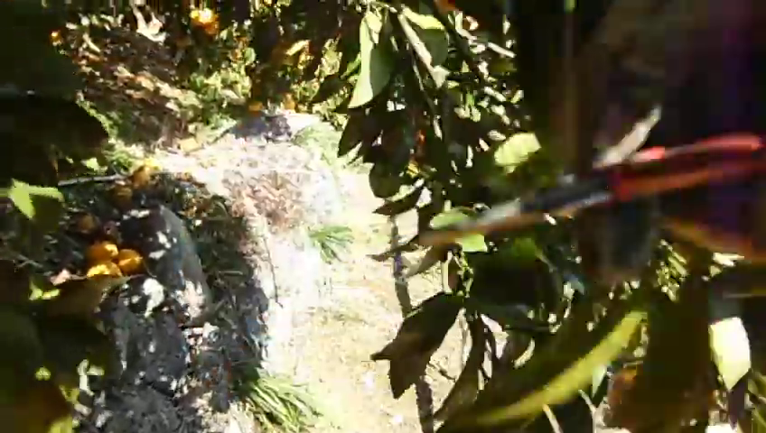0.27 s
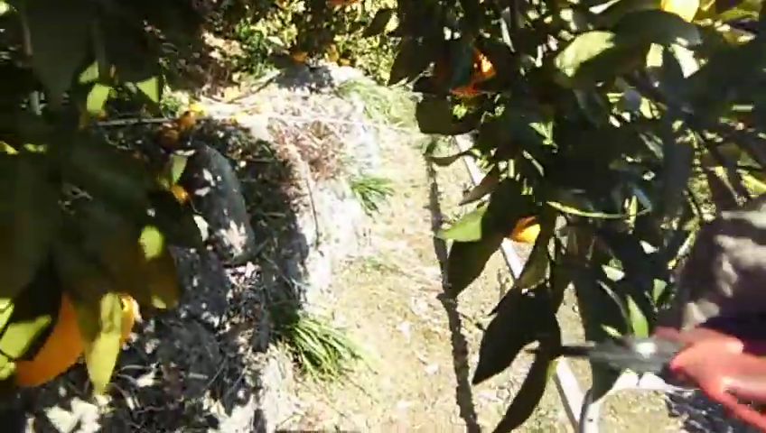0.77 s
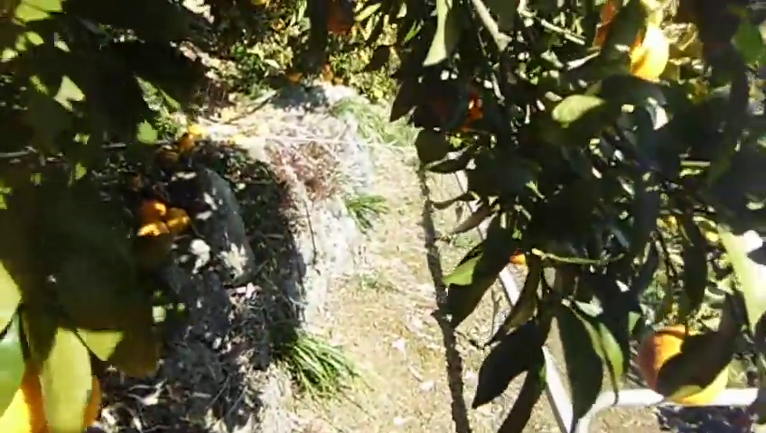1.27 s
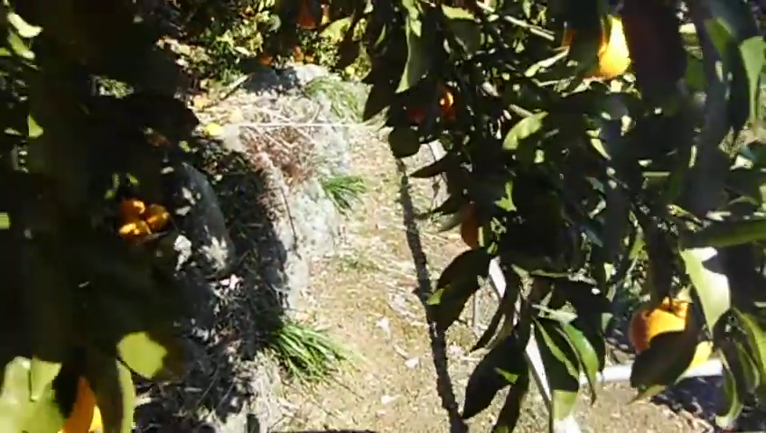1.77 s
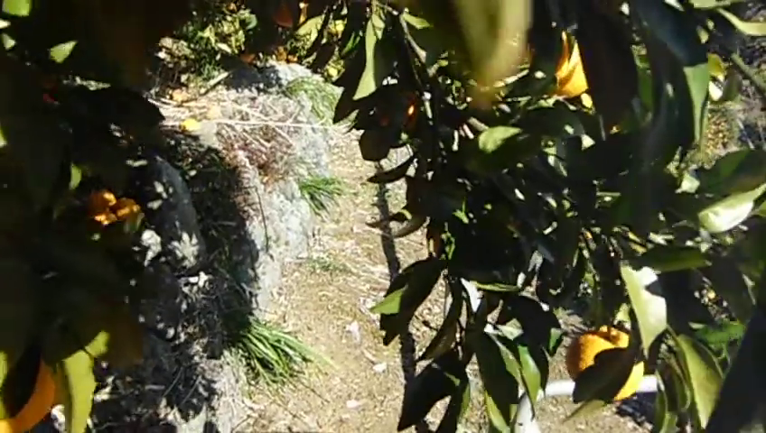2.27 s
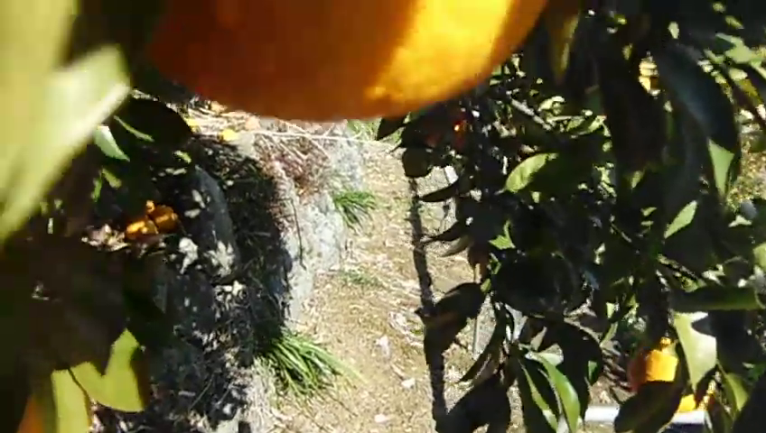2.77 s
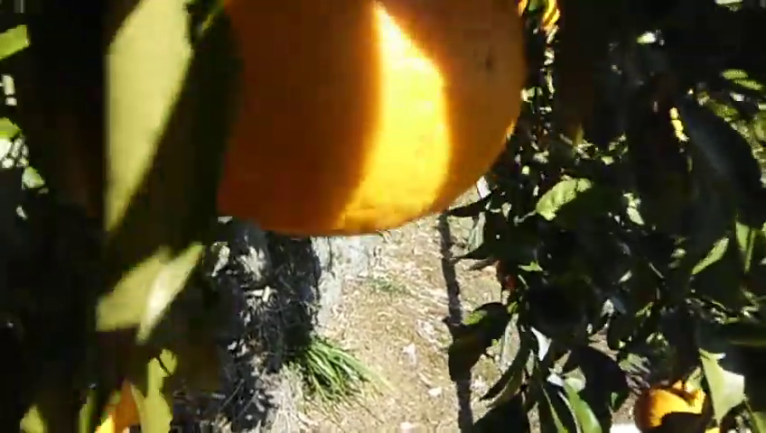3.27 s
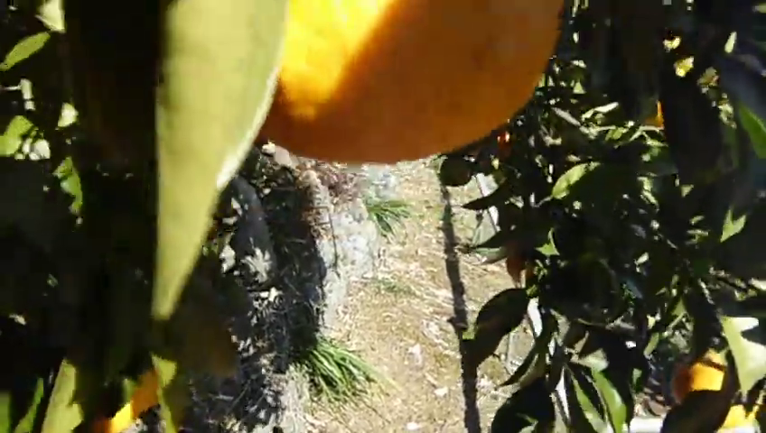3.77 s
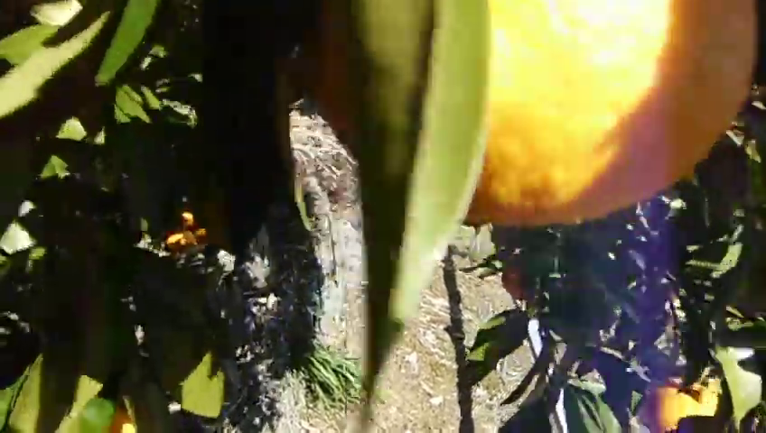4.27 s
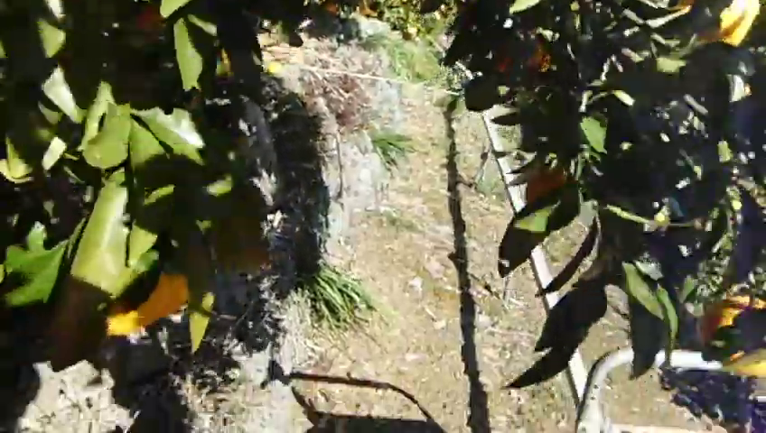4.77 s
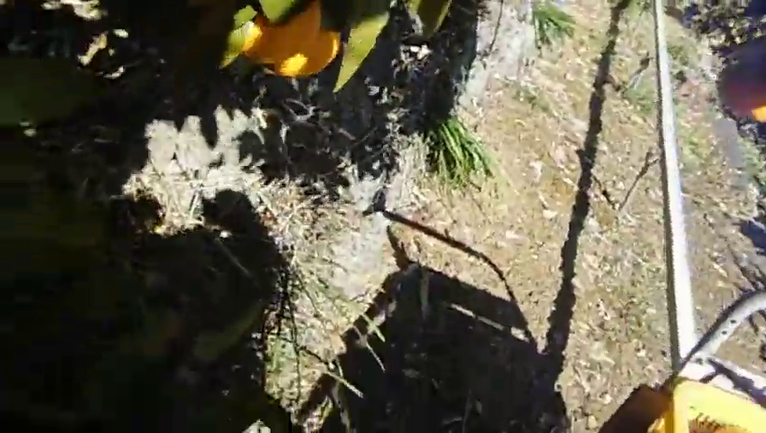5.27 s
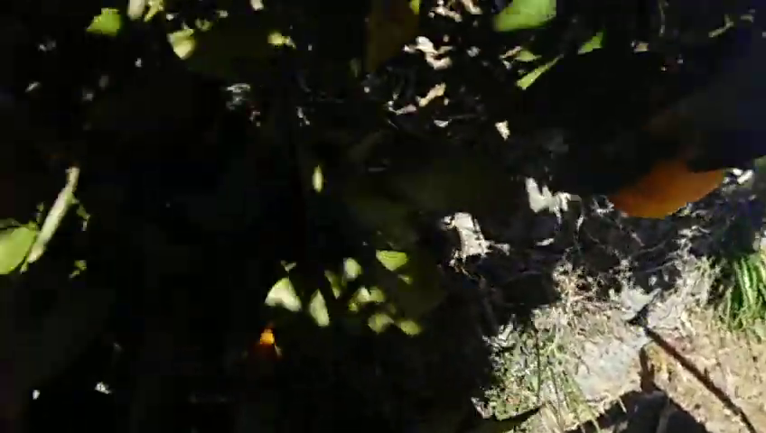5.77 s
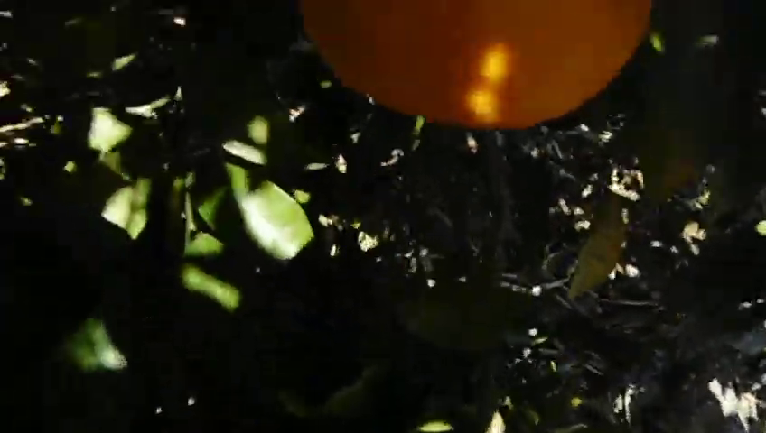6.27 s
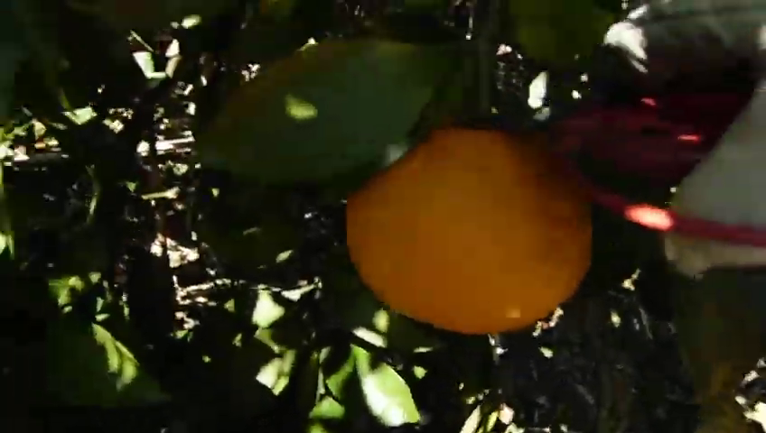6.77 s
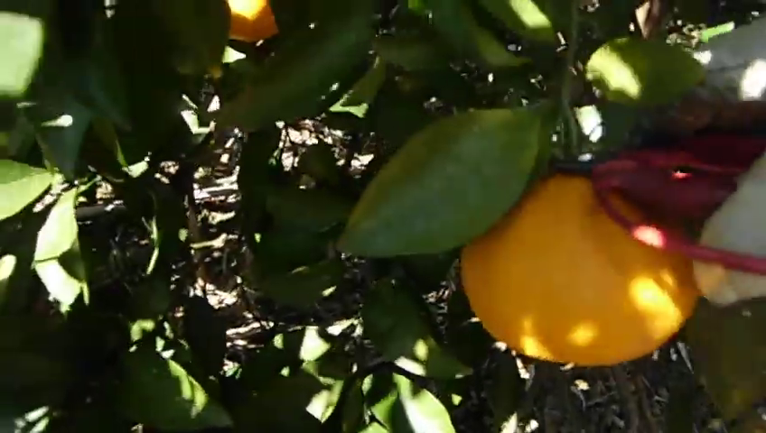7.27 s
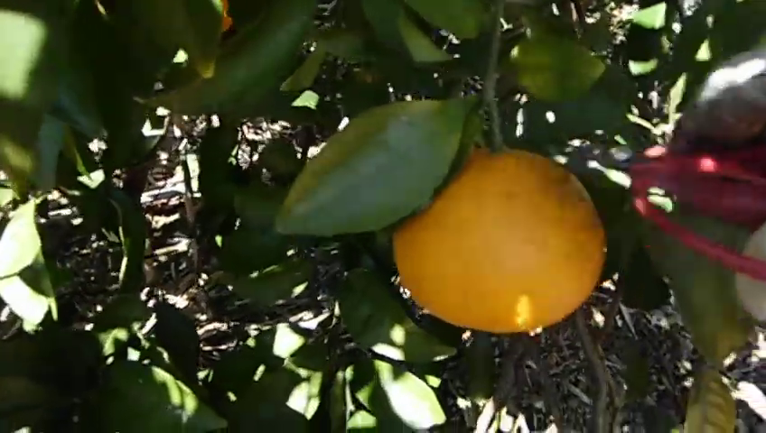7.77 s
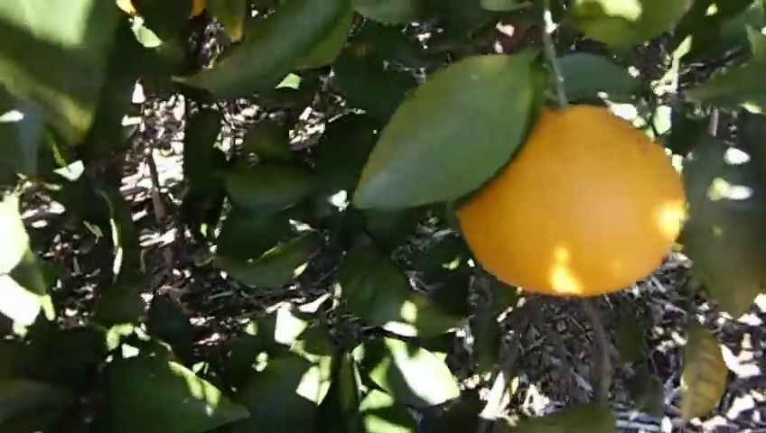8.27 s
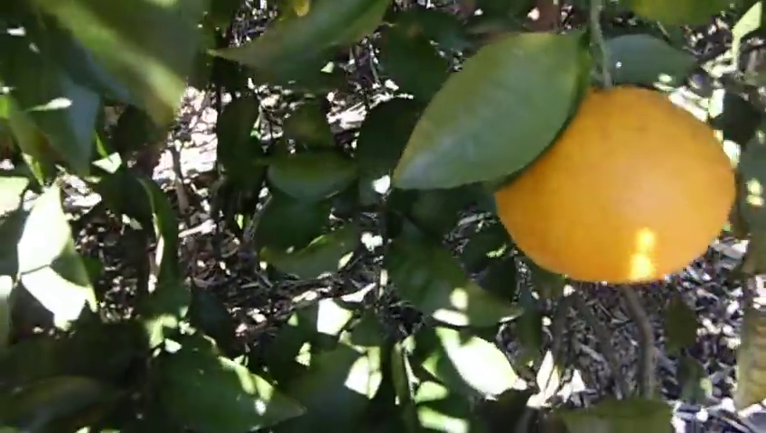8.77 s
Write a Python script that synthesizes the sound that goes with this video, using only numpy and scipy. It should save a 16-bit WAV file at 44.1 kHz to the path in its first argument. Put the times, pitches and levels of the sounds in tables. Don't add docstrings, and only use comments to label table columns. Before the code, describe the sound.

A close, dry take among fruit trees: a sharp metallic snip, leaf crackle and tiny squeaks, then several seconds of light rustling and pricking leaves. A second snip follows, with bigger leaf snaps, bumps on the camera body, a spring squeak and one hard steel click. Afterwards only sparse twig taps, leaf flicks, faint squeaks and quiet preamp hiss remain.

```python
import sys
import numpy as np
from scipy import signal
from scipy.fft import rfft, irfft
from scipy.io import wavfile
from scipy.ndimage import uniform_filter1d

SR = 44100
rng = np.random.default_rng(int(sys.argv[2]) if len(sys.argv) > 2 else 0)


def log_audio(samples):
    frames = np.atleast_2d(samples).T
    limited = np.clip(frames, -1, 1)
    pcm = np.round(limited * 32767).astype(np.int16)
    wavfile.write(sys.argv[1], SR, pcm)


def amplitude_ratio(level_db):
    exponent = np.asarray(level_db, float) / 20
    return 10 ** exponent


N = 397782


def evened(x):
    return x / np.sqrt(np.mean(x ** 2) + 1e-20)


def peaked(x):
    return x / abs(x).max()


def add(mix, s, sound):
    part = mix[round(s * SR):][:len(sound)]
    part += sound[:len(part)]


def coloured(x, points):
    f, db = np.transpose(points)
    hz = np.fft.rfftfreq(len(x), 1 / SR)
    curve_db = np.interp(np.log(hz + 1), np.log(f + 1), db)
    return evened(irfft(rfft(x) * amplitude_ratio(curve_db), len(x)))


def ring(x, modes):
    out = np.zeros(len(x))
    for hz, width, db in modes:
        pole = np.exp((2j * np.pi * min(hz, .45 * SR) - np.pi * width) / SR)
        out += amplitude_ratio(db) * 2 * signal.lfilter([1 - abs(pole)], [1, -pole], x).real
    return out


def swells(rows, rest_db):
    t = np.arange(N) / SR
    power = amplitude_ratio(rest_db) ** 2
    for s, db, rise, fall in rows:
        steps = np.maximum((s - t) / rise, (t - s) / fall)
        power = power + amplitude_ratio(db - 10 * steps) ** 2
    return 10 * np.log10(power)


# (frequency [Hz], level [dB per Hz])
HISS_COLOUR = [(4.7, -24), (8.0, -6), (18, -16.5), (33, -18), (62, -20), (113, -26.5), (151, -29),
               (419, -33), (508, -40.5), (699, -44), (1660, -55.5), (9900, -53), (16500, -68.5)]


def preamp_hiss():
    return amplitude_ratio(-61.5) * coloured(rng.standard_normal(N), HISS_COLOUR)


def slips(per_s, spread_db, length):
    out, t = np.zeros(N), np.arange(400)
    size_db = spread_db * np.minimum(rng.exponential(1, N), 3.5)
    size = amplitude_ratio(size_db) * (rng.random(N) < per_s / SR)
    kind = rng.integers(0, 12, N)
    for k, hz in enumerate(np.geomspace(2200, 11000, 12)):
        puff = rng.standard_normal(400) * np.exp(-t / length)
        puff = 0.14 * evened(puff) + evened(ring(puff, [(hz, 0.75 * hz, 0)]))
        out += signal.oaconvolve(size * (kind == k), puff)[:N]
    return evened(out)


def patchy(x, depth_db):
    z = signal.stft(x, nperseg=256)[2]
    field = uniform_filter1d(rng.standard_normal(z.shape), 12, axis=0)
    field = evened(uniform_filter1d(field, 16, axis=1))
    return evened(signal.istft(z * amplitude_ratio(depth_db * field), nperseg=256)[1][:N])


def clumps():
    return evened(uniform_filter1d(uniform_filter1d(rng.standard_normal(N), 500), 300))


# (frequency [Hz], level [dB per Hz])
CRACKLE_COLOUR = [(710, -30), (1200, -24.5), (2220, -6), (2530, -8), (2980, -5.5), (9430, -1), (13000, -9),
                  (15300, -15), (16000, -33.5), (16500, -41)]
# (frequency [Hz], level [dB per Hz])
RUB_COLOUR = [(150, -15), (300, -0.5), (600, -2.5), (1200, -6), (2200, -15), (4000, -17), (8000, -30)]
# (time of most motion [s], rustle level [dB], rub level [dB], 10 dB swell [s], 10 dB settle [s])
MOVES = [(.12, -48.5, -61, .12, .15), (.35, -52.5, -58.5, .12, .27), (.92, -62, -68.5, .1, .4),
         (1.38, -61.5, -70, .4, .3), (1.61, -59, -67.5, .2, .25), (2.0, -65.5, -74, .2, .2),
         (2.64, -67, -69, .3, .2), (2.9, -64, -70, .15, .15), (3.02, -58, -69, .06, .05),
         (3.2, -66, -67, .2, .3), (1.07, -61, -72, .04, .06), (3.56, -57.5, -69.5, .15, .07),
         (4.12, -59.5, -72.5, .25, .2), (4.47, -55, -63, .1, .4), (4.72, -51.5, -58, .1, .2),
         (5.5, -65, -68.5, .5, .4), (5.78, -60, -64.5, .15, .3), (5.98, -54, -67, .15, .17),
         (6.3, -62, -71.5, .3, .4), (6.57, -62, -73, .3, .6), (7.02, -61.5, -69, .15, .13),
         (7.48, -66.5, -76, .12, .2), (7.85, -68.5, -74, .2, .3), (8.17, -64, -71, .15, .25),
         (8.4, -61.5, -75, .15, .1), (8.74, -63.5, -70.5, .25, .15), (8.97, -60, -75, .12, .3)]
# (time [s], crackle level [dB])
SHAKES = [
    [(.034, -38), (.05, -47), (.085, -49.5), (.11, -51), (.2, -55), (.3, -62)],
    [(4.366, -37), (4.392, -36.5), (4.415, -43.5), (4.435, -40), (4.46, -51.5), (4.6, -66)],
]


def foliage():
    slower = 1.4
    rustle_rows = [(s, db, rise, fall) for s, db, _, rise, fall in MOVES]
    rub_rows = [(s, db, rise * slower, fall * slower) for s, _, db, rise, fall in MOVES]
    rustle_db, rub_db = swells(rustle_rows, -75), swells(rub_rows, -80)

    noise, clump = rng.standard_normal(N), clumps()
    drive = patchy(noise + 0.53 * slips(800, 4.0, 30.), 1.6) * amplitude_ratio(1.6 * clump)
    rustle = coloured(drive, CRACKLE_COLOUR) * amplitude_ratio(rustle_db)
    rub = coloured(noise + .7 * drive, RUB_COLOUR) * amplitude_ratio(rub_db)

    t = np.arange(N) / SR
    shake = sum(amplitude_ratio(np.interp(t, *np.transpose(rows), -120, -120)) for rows in SHAKES)
    crackle = (.7 * noise + slips(1200, 4.3, 45.)) * amplitude_ratio(2.5 * clump)
    shaken = coloured(crackle, CRACKLE_COLOUR) * shake * amplitude_ratio(-2.5)
    return rustle + rub + shaken


def let_go(rows, t60, share, wide):
    out, t = np.zeros(N), np.arange(2400) / SR
    band = signal.butter(3, (1700, 11900), "bandpass", fs=SR)
    for s, db, hz, knock_db in rows:
        noise, lumps = rng.standard_normal((2, 2400))
        burst = noise * np.exp(1.5 * uniform_filter1d(lumps, 12)) * amplitude_ratio(-60 * t / t60)
        burst *= np.minimum(t / .0005, 1)
        dry_edge = peaked(signal.lfilter(*band, burst))
        ringing = peaked(ring(burst, [(hz, wide * hz, 0)]))
        edge = peaked((1 - share) * dry_edge + share * ringing)
        knock = peaked(ring(burst, [(150, 360, -5.5), (327, 670, 0), (1040, 310, -7.5)]))
        add(out, s - .0005, amplitude_ratio(db) * (edge + amplitude_ratio(knock_db + 8.5) * knock))
    return out


# (time [s], peak level [dB], ring [Hz])
PRICKS = [(.254, -39, 3400), (.567, -44, 7200), (.633, -45, 4800), (.964, -45, 5900), (1.057, -43, 3800),
          (1.169, -47, 8800), (1.186, -47, 10000), (1.537, -45, 4700), (1.77, -47, 7800), (1.78, -48, 2400),
          (1.87, -52, 2900), (2.053, -51, 9000), (2.073, -46, 3000), (2.12, -51, 2100), (2.136, -54, 7200),
          (2.218, -51, 2100), (2.372, -52, 3800), (2.463, -52, 3800), (2.593, -49, 3600),
          (2.801, -50, 5000), (2.966, -47, 11400), (3.123, -43, 4300), (3.143, -48, 2600),
          (3.179, -45, 2600), (3.238, -51, 10900), (3.402, -49, 7800), (3.546, -43, 5200),
          (3.601, -49, 2100), (3.619, -46, 1900), (4.016, -48, 8470), (4.039, -48, 4000),
          (4.155, -47, 6500), (4.2176, -43, 7170), (4.309, -46, 8000), (4.322, -46, 7500),
          (4.7615, -41, 2900), (4.836, -45, 2100), (5.464, -50, 6000), (5.681, -48, 9500),
          (5.74, -46, 2200), (5.966, -44, 3000), (6.09, -43, 9100), (6.348, -48, 9800), (6.399, -47, 10000),
          (6.464, -44, 6900), (6.751, -43, 4300), (7.19, -49, 3800), (7.441, -47, 3350),
          (7.5024, -49, 5650), (7.7059, -48, 3910), (7.839, -48, 3500), (8.066, -47, 4500),
          (8.138, -46, 4500), (8.2068, -46, 4000), (8.249, -49, 1800), (8.454, -48, 2800),
          (8.683, -45, 6500), (8.6992, -45, 3430), (8.8069, -50, 7640), (8.897, -49, 10000)]


def pricks():
    return let_go([(*row, -19) for row in PRICKS], t60=.009, share=.55, wide=.4)


# (time [s], peak level [dB], ring [Hz])
FLICKS = [(2.6762, -42, 8200), (2.9522, -43, 10700), (3.4086, -37, 8800), (3.4264, -45.5, 8760),
          (4.1246, -41, 9200), (4.236, -44.5, 7800), (4.2574, -42, 7050), (4.2966, -43, 7890),
          (4.408, -28, 9930), (5.551, -32, 8300), (5.8321, -43, 8530), (6.2526, -44, 8810),
          (7.5772, -43, 7950), (7.642, -43.5, 8010), (7.7935, -40.5, 9270), (7.956, -39, 6460)]


def flicks():
    return let_go([(*row, -30) for row in FLICKS], t60=.014, share=.82, wide=.3)


# (time [s], peak level [dB], ring [Hz], knock level [dB])
TWIGS = [(.2352, -35, 4050, -31), (.2913, -32, 3930, -24), (.3632, -38, 2160, -16), (.393, -42, 2200, -2.5),
         (2.703, -42, 2560, -31), (3.228, -49, 2570, -14), (3.464, -52.5, 1590, -2.5),
         (3.5874, -39.5, 4470, -21), (4.6697, -36, 1490, -8), (4.7135, -36, 3060, -4),
         (4.754, -41, 3040, -31), (4.768, -46, 1950, -26), (4.8575, -30.5, 3020, -17),
         (5.4287, -35, 3000, -50), (5.5189, -41.5, 3000, -26), (6.0464, -33, 2400, -18),
         (6.0788, -44, 4410, -16), (6.3869, -45, 3300, -12), (6.7754, -46.5, 3110, -17),
         (6.9253, -38.5, 3200, -5), (7.0616, -51, 3070, -18), (7.237, -49, 4840, -18),
         (7.2592, -48, 2930, -12), (6.742, -53, 2400, -6), (8.0713, -42, 4690, -31),
         (8.5071, -46, 3000, -11), (8.9417, -22.5, 4300, -36)]


def twigs():
    return let_go(TWIGS, t60=.018, share=.8, wide=.3)


# (time [s], peak level [dB], knock level [dB])
SNAPS = [(.0937, -27.5, -31), (.0997, -29, -23), (.104, -30, -33), (.4316, -37, -36), (.451, -40, -25),
         (.974, -43, -24), (1.381, -36, -24), (1.3947, -32.5, -26), (1.9325, -39, -26), (1.954, -39, -18.5),
         (1.969, -34, -24), (3.1103, -39, -13), (3.5216, -42, -17), (3.6088, -39, -22),
         (3.6541, -45.5, -18), (4.372, -29, -18), (4.4134, -30, -21), (4.4288, -24, -20), (4.784, -35, -20),
         (5.977, -41, -19), (6.9458, -38.5, -8), (7.4545, -37, -28), (7.5242, -43.5, -19),
         (7.86, -36.5, -30), (7.9964, -38.5, -21), (8.3866, -29.5, -19), (8.8714, -37.5, -24),
         (8.9412, -30, -40), (8.9795, -37, -34), (9.0032, -38, -38), (.139, -39, -28)]


def snaps():
    rows = [(s, db, 6500, knock_db) for s, db, knock_db in SNAPS]
    return let_go(rows, t60=.013, share=.15, wide=.3)


# (time [s], peak level [dB], ring [Hz], knock below 1.5 kHz [dB])
DRAGS = [(.3372, -33.5, 7760, -13.5), (.9341, -34, 5100, -20), (1.043, -43, 3280, -21),
         (1.5635, -25, 5950, -22), (3.0975, -34, 7670, -17), (4.3792, -23, 3400, -20),
         (4.3889, -27, 4940, -17), (4.638, -25, 2700, -12), (4.6457, -23.5, 2940, -36),
         (4.6753, -34.5, 2570, -27), (4.6897, -28.5, 7210, -14), (6.007, -37, 4520, -14),
         (6.2684, -39, 7000, -23), (7.8327, -45, 4180, -20), (8.118, -36.5, 4570, -27),
         (8.1545, -42, 7500, -25), (8.6319, -35, 5360, -28), (8.6765, -41, 3300, -23),
         (8.941, -25, 9800, -45), (9.009, -41, 9500, -35), (1.943, -44, 6000, -22), (1.996, -45, 7000, -25),
         (1.718, -46, 4500, -25), (3.152, -48, 2300, -22), (8.147, -42, 3700, -14), (6.3, -42, 8500, -30),
         (5.79, -45, 3000, -20), (1.572, -33, 8000, -28), (8.952, -38, 4250, -35), (5.587, -49, 4500, -30)]


def drags():
    return let_go(DRAGS, t60=.038, share=.3, wide=.25)


# (time [s], thump level [dB], 10 dB swell [s], 10 dB settle [s])
THUMPS = [
    (.335, -50, .004, .16),
    (4.683, -43.5, .004, .1),
    (4.79, -47, .08, .025),
    (6.748, -55, .021, .023),
    (6.935, -45, .006, .015),
    (7.06, -60, .1, .02),
]
# (frequency [Hz], level [dB per Hz])
THUMP_COLOUR = [(15, -13.5), (35, -2), (70, -0.5), (140, -7.5), (300, -21.5), (600, -35)]
# (time [s], level [dB], body swing [Hz])
KNOCKS = [(0.0268, -24, 320), (.027, -33, 110), (4.354, -25, 350), (4.354, -34, 60), (3.098, -46, 600),
          (8.387, -44, 500), (4.722, -35, 45), (.3365, -32, 112), (.337, -38, 330), (.934, -42, 298),
          (4.636, -37, 196), (4.676, -29, 800), (4.689, -27, 60), (4.713, -44, 300), (6.9255, -35.5, 166),
          (6.946, -41, 266), (.372, -42, 90), (.397, -40, 60), (.438, -45, 70), (.458, -45, 50),
          (4.757, -41, 70), (4.784, -41, 80), (4.796, -42, 45), (1.563, -39, 450)]


def hand():
    out = coloured(rng.standard_normal(N), THUMP_COLOUR) * amplitude_ratio(swells(THUMPS, -120))
    t = np.arange(2000) / SR
    for s, db, hz in KNOCKS:
        onset = np.minimum(t / (.0002 + .1 / hz), 1)
        swing = np.cos(2 * np.pi * hz * t * (1 - 7.0 * t))
        add(out, s, amplitude_ratio(db) * onset * swing * np.exp(-(60 + 0.91 * hz) * t))
    return out


def whistle():
    s, length_s, db, mode = .187, .013, -51, [(12800, 1500, 0)]
    t, out = np.arange(1200) / SR, np.zeros(N)
    scrape = evened(ring(ring(rng.standard_normal(1200), mode), mode))
    add(out, s, amplitude_ratio(db) * scrape * np.minimum(t / .001, 1) * np.exp(-(t / length_s) ** 2))
    return out


# (time [s], length [s], level [dB], low mode relative level [dB], pitch drop [share])
SQUEAKS = [(.158, .021, -57, -16, .2), (.185, .022, -46.5, -20, .15), (.21, .024, -53, -20, .16),
           (4.646, .018, -42, -24, -.017), (4.718, .015, -48, -26, -.031), (5.034, .03, -45, -20, -.014),
           (6.455, .05, -77, 8, .038), (6.495, .055, -71, 10.5, .023), (7.064, .052, -58, -6, -.02),
           (7.084, .02, -52, -18, -.034), (7.099, .018, -52, -18, -.0094), (7.116, .022, -42, -11, -.0026),
           (7.256, .014, -69, 3, -.022), (8.8805, .011, -50, -13, -.015)]
# (frequency [Hz], level [dB])
COIL = [(2930, -0.5), (3300, -9), (3480, -12.5), (4600, -11)]


def spring():
    out, t = np.zeros(N), np.arange(2600) / SR

    def swell(late, length):
        return np.sin(np.pi * np.clip((t - late) / length, 0, 1)) ** 1.2

    for s, length, db, low_db, sink in SQUEAKS:
        noise = rng.standard_normal((6, 2600))
        wobble = uniform_filter1d(noise, 150, axis=1) * np.sqrt(150)
        upper_db = -3 + 40 * sink
        modes = [(hz, mode_db + upper_db * (k > 0), 0) for k, (hz, mode_db) in enumerate(COIL)]
        modes.append((1150, low_db, 0.28 * length))
        squeak = 0.6 * 0.43 * evened(ring(noise[5], [(2700, 1600, 0)])) * swell(0, length)
        for (hz, mode_db, late), w in zip(modes, wobble):
            turns = hz * (1 - sink) * np.cumsum(1 + .018 * w[::-1] - 0.3 * t) / SR
            squeak += amplitude_ratio(mode_db + 3.6 * w) * swell(late, length) * np.sin(2 * np.pi * turns)
        add(out, s, amplitude_ratio(db) * squeak)
    return out


def crack(length):
    t = np.arange(1200) / SR
    return rng.standard_normal(1200) * np.sqrt(t / length) * np.exp(-t / length)


# (time [s], level [dB], modes (frequency [Hz], width [Hz], level [dB]), burst [s])
LATCH = [
    (5.0651, -10.5, [(8000, 1000, -5), (9600, 1200, -6), (11200, 2100, -5), (4650, 900, -8), (6000, 1200, -10)], 0.00028),
    (5.0655, -28, [(2000, 500, -3), (2450, 600, -1), (3400, 800, -2)], 0.0011),
]


def latch():
    out = np.zeros(N)
    for s, db, modes, length in LATCH:
        add(out, s - .0002, amplitude_ratio(db) * peaked(ring(ring(crack(length), modes), modes)))
    return signal.lfilter(*signal.butter(1, 1200, "highpass", fs=SR), out)


# (time [s], level [dB], handle share [0-1], burst [s], leading blade mode [Hz])
CRACKS = [(.0241, -14, .3, .0006, 8000), (.0257, -5, .4, .0004, 10300), (.027, -1, 0, .0006, 11300),
          (.0281, -4, .5, .0005, 9550), (.0292, -9, .3, .0006, 9550), (.0306, -20, .5, .002, 9500),
          (4.3483, -28, .2, .0005, 9000), (4.3517, -10, .1, .0004, 9050), (4.3532, -6, .08, .0004, 7200),
          (4.3538, -4, 0, .0004, 9050), (4.3549, -3, .1, .0004, 11000), (4.3555, -10, .85, .0007, 10200),
          (4.3568, -16, .1, .0005, 8500), (4.3582, -19, .2, .0012, 9500), (4.363, -25.5, .1, .0033, 8500)]
# (frequency [Hz], width [Hz], level [dB])
BLADES = [(5600, 750, -11), (7200, 1900, -5.5), (8550, 1900, 1), (10100, 900, -2), (10950, 1000, 3),
          (13500, 900, -12)]
# (frequency [Hz], width [Hz], level [dB])
HANDLE = [(1270, 200, -22), (2060, 300, 7.5), (3030, 1500, -4.5), (4400, 2100, -10.5)]


def cuts():
    out = np.zeros(N)
    slim = signal.butter(2, 3500, "highpass", fs=SR)
    for s, db, low, length, lead_hz in CRACKS:
        burst = crack(length)
        blades = ring(signal.lfilter(*slim, burst), BLADES + [(lead_hz, 700, 8)])
        body = (1 - low) * peaked(blades) + low * peaked(ring(burst, HANDLE))
        add(out, s - .0002, amplitude_ratio(db) * peaked(body))
    return signal.lfilter(*signal.butter(1, (900, 15500), "bandpass", fs=SR), out) * amplitude_ratio(2.5)


def scene():
    steel = cuts() + latch()
    ticks = drags() + twigs() + flicks() + snaps() + pricks()
    sharp = steel + ticks + spring() + whistle()
    t = np.arange(2000) / SR
    scatter = uniform_filter1d(rng.standard_normal(2000), size=4) * amplitude_ratio(-60 * t / .03) * (t > .002)
    wet = signal.oaconvolve(sharp, scatter / np.linalg.norm(scatter))[:N]
    return (sharp + amplitude_ratio(-24) * wet + foliage() + hand())[None]


# (frequency [Hz], level [dB])
EDGE = [(15700, 0), (16000, -26), (16600, -28), (16900, -90)]


def band_edge(x):
    hz = np.fft.rfftfreq(N, 1 / SR)
    return irfft(rfft(x) * amplitude_ratio(np.interp(hz, *np.transpose(EDGE))), N)


def low_pass(x):
    return signal.sosfilt(signal.butter(12, 17020, fs=SR, output="sos"), x)


def record(dry):
    wired = dry[0] + preamp_hiss()
    wired = .8 * np.tanh(wired / .8)
    mix = band_edge(wired)[None] + .0069
    return low_pass(mix)


dry = scene()
out = record(dry)
log_audio(out)
```